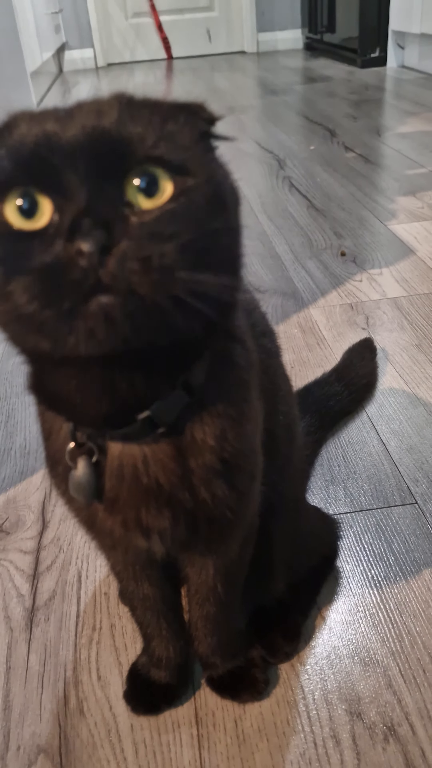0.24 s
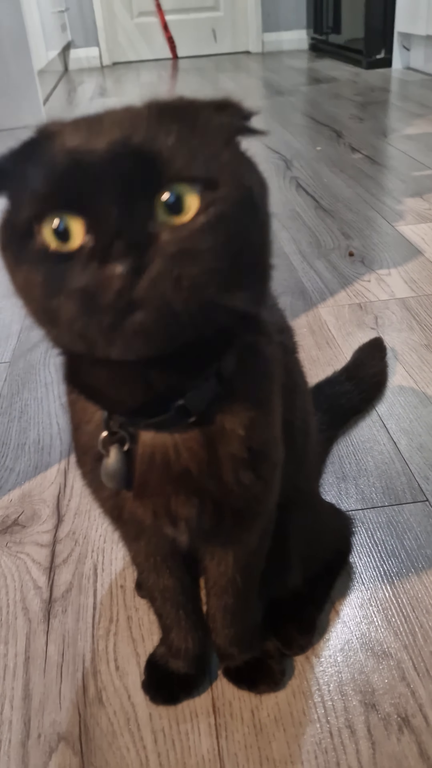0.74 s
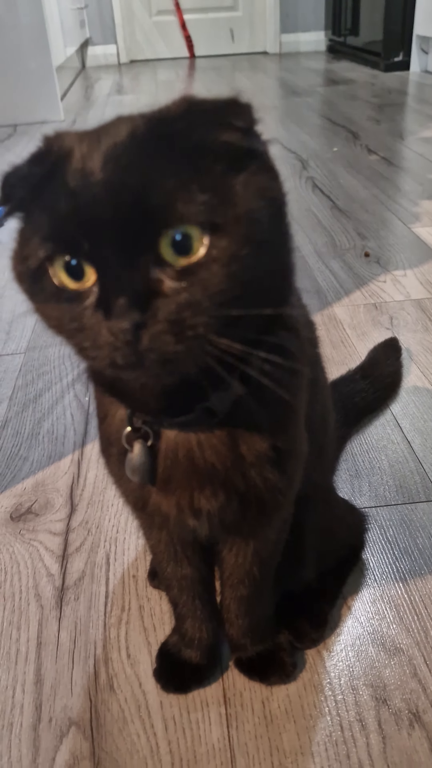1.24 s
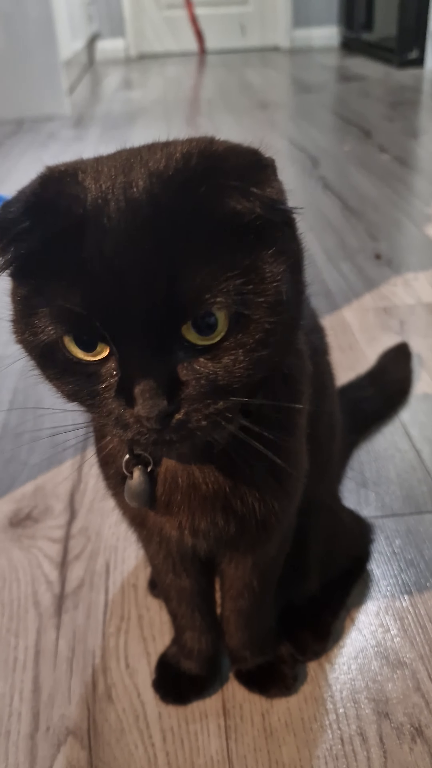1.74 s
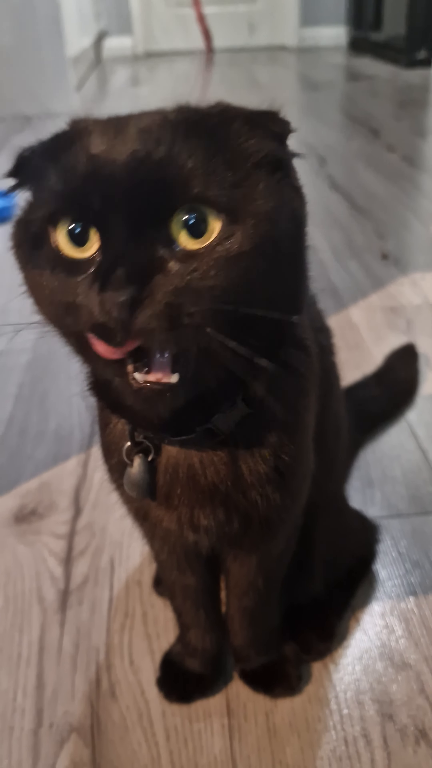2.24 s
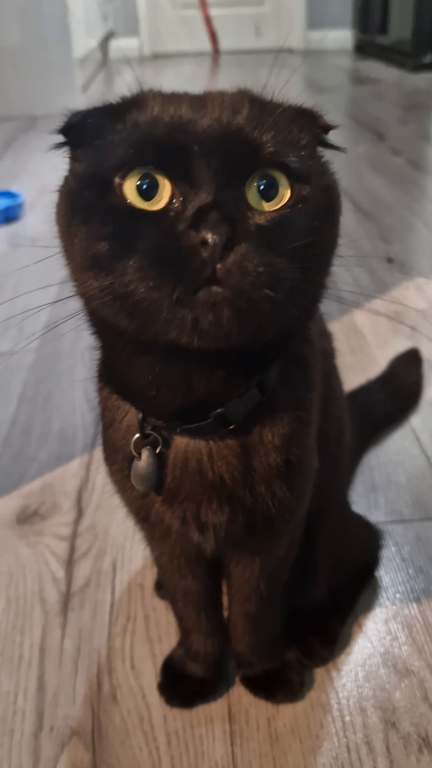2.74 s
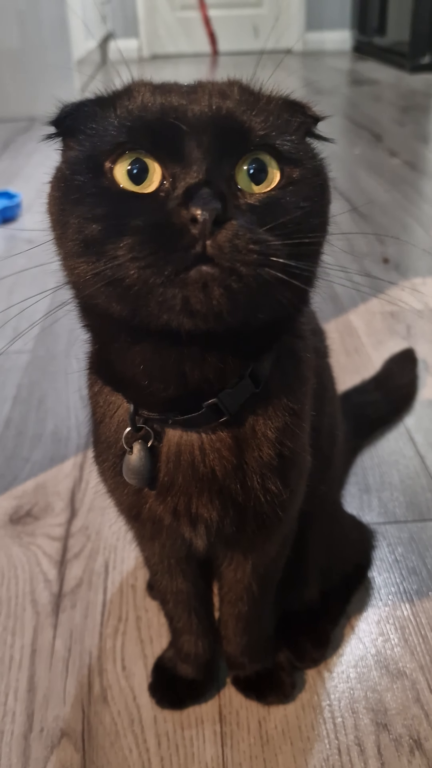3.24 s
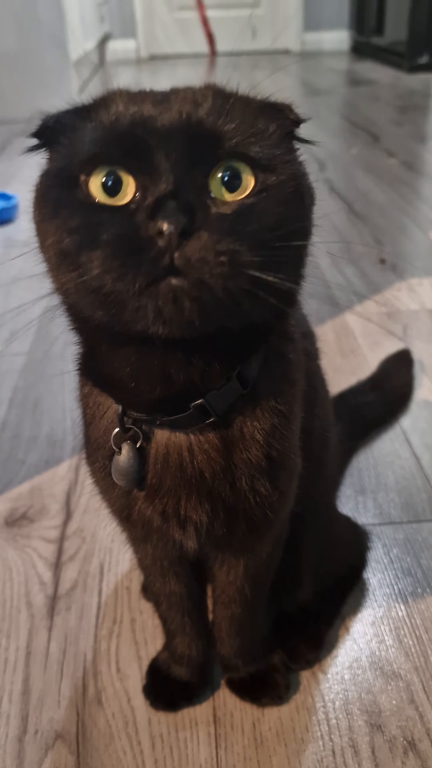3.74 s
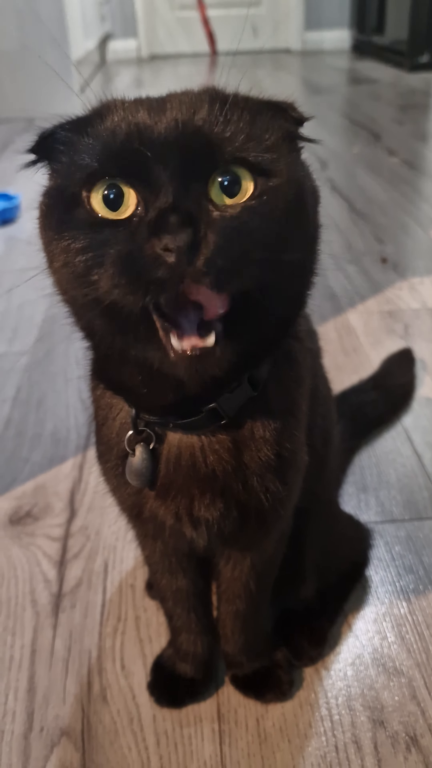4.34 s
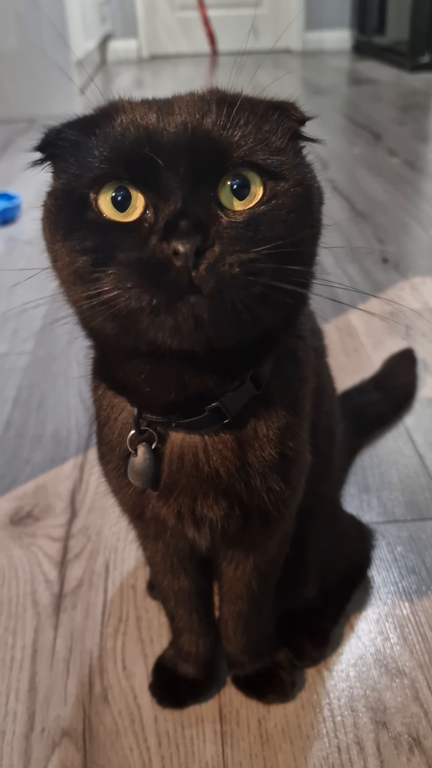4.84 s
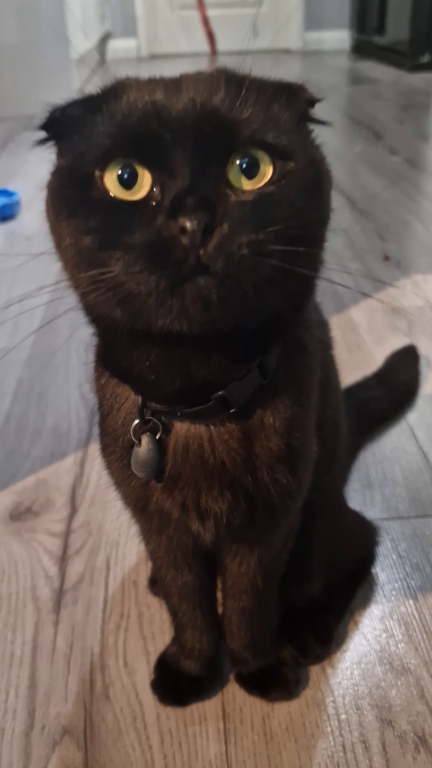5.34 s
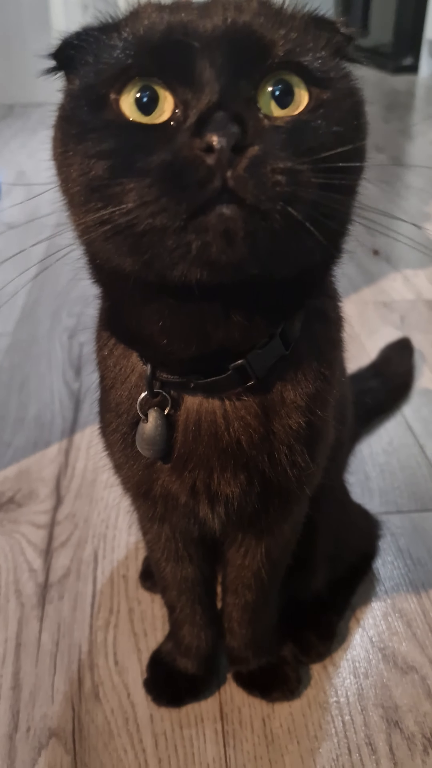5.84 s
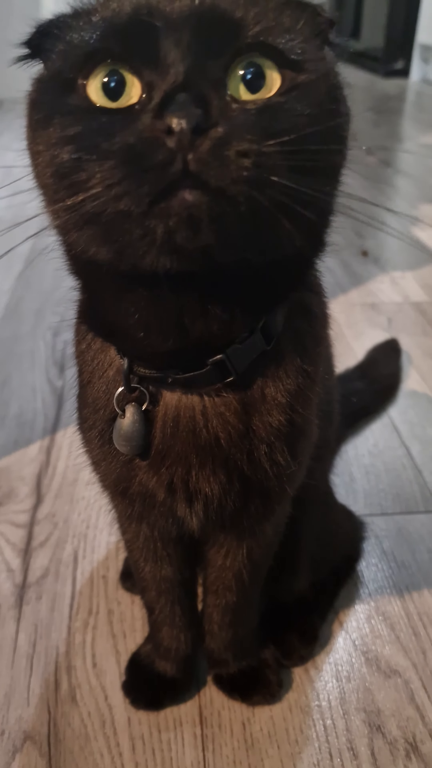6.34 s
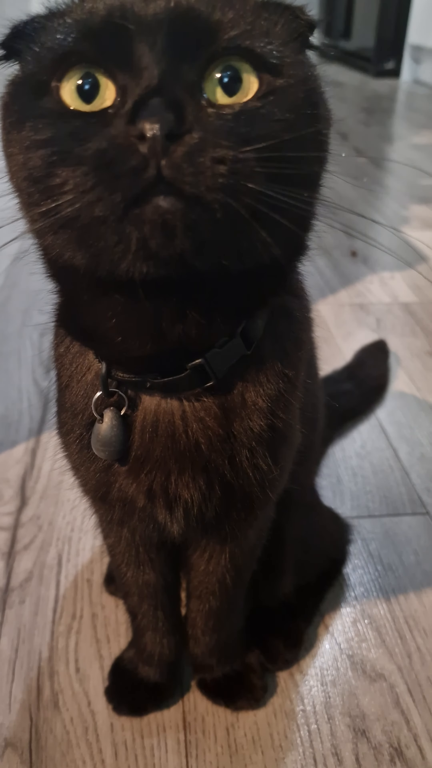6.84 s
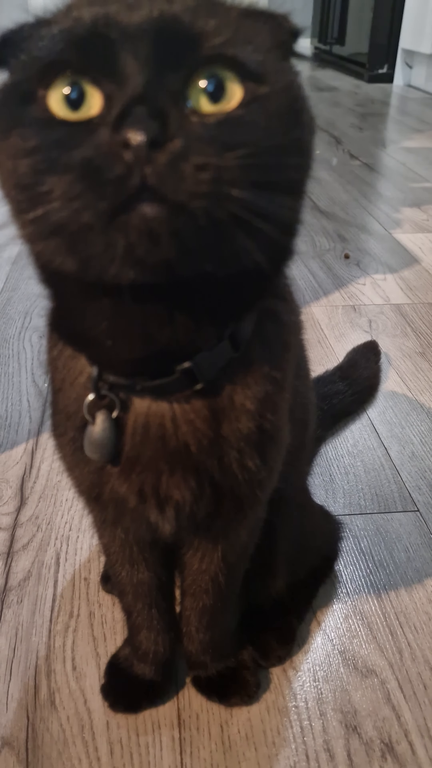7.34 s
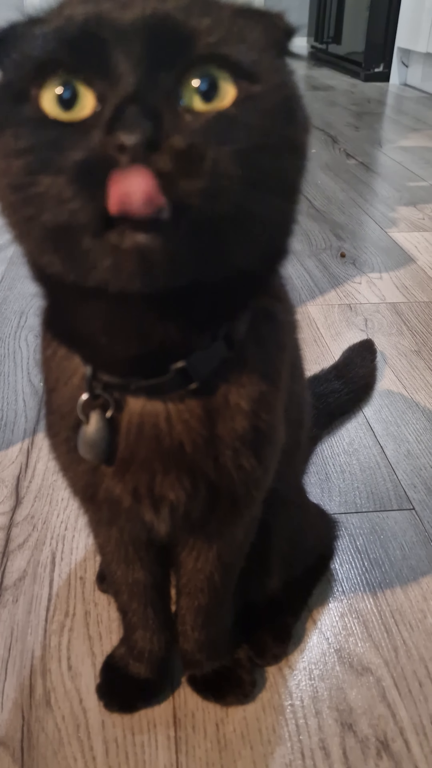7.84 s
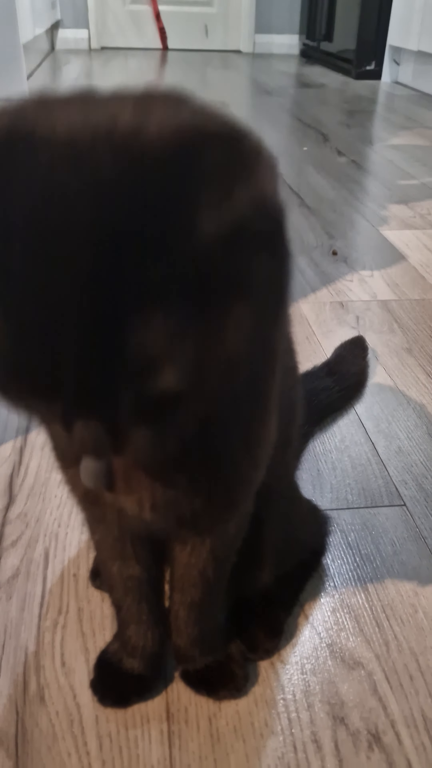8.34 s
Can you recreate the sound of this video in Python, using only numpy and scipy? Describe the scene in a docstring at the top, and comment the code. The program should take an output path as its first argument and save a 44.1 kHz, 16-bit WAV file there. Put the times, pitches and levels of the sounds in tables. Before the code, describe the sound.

Thin packaging crackles to the right for about two seconds, getting sharper and busier. A cat then eats very near the microphone: sticky lip pops, crisp crunches and gritty crumbs, thickest early on, later sparse with pauses, a second short crunch and wet tongue strokes. Indoors, quiet, with a short room tail, soft bumps and a distant steady hum.

```python
"""A cat eats a dry treat close to the microphone, in a quiet room with a hard floor; an appliance hums far off.
First something crinkly, likely the treat pouch, rubs and snaps off to the right, with dull handling bumps.
Then wet lip smacks and bursts of bites: each snap is a cluster of fractures ringing a hollow and a hard piece.
Crumbs grind as noisy slips; lips squeak as chirps; later the tongue licks in slips between smacks and bites.
The smacks and bites sway left and right with the head; a floor bounce and a short tail answer."""
import sys
import numpy as np
from scipy import signal
from scipy.fft import rfft, irfft, next_fast_len
from scipy.io import wavfile
from scipy.ndimage import uniform_filter1d, map_coordinates

SR = 44100
rng = np.random.default_rng(int(sys.argv[2]) if len(sys.argv) > 2 else 0)


def wav_record(signal):
    """Record a signal, one row per channel, as 16-bit PCM in the file named by sys.argv[1]."""
    frames = np.transpose(np.atleast_2d(signal))
    bounded = np.clip(frames, -1, 1)
    # unit amplitude maps onto the largest positive 16-bit level
    quanta = np.round(bounded * 32767).astype(np.int16)
    wavfile.write(sys.argv[1], SR, quanta)


N = 378373
TOP_HZ = 16200  # band limit of the microphone chain


def amp(db):
    """Decibels to gain."""
    return 10 ** (np.asarray(db) / 20)


def unit(x):
    """x at rms 1."""
    return x / np.sqrt(np.mean(x ** 2) + 1e-20)


def along(points, hz):
    """(Hz, value) points read on a log frequency axis."""
    f, v = np.transpose(points)
    return np.interp(np.log(hz + 1), np.log(f + 1), v)


def wobble(rate, n=N):
    """A smooth random curve of n samples, rate knots a second."""
    knots = rng.standard_normal(int(n * rate / SR) + 4)
    return map_coordinates(knots, [np.arange(n) * rate / SR])


def filtered(x, response):
    """x times a complex response of frequency."""
    n = x.shape[-1]
    m = next_fast_len(n + 2048)
    return irfft(rfft(x, m) * response(np.fft.rfftfreq(m, 1 / SR)), m)[..., :n]


def add(track, s, x):
    """Mix x into the track from time s."""
    part = track[:, max(round(s * SR), 0):][:, :x.shape[-1]]
    part += x[..., :part.shape[-1]]


def band(hz, low_hz, high_hz, order):
    """Gain of a band with a gentle low edge and a top edge of the given order."""
    low_edge = hz / np.hypot(hz, low_hz)
    return low_edge / np.sqrt(1 + (hz / high_hz) ** (2 * order))


def resonance(hz, centre_hz, q, skirt=3):
    """Gain of one damped resonance whose far skirts fall away."""
    u = hz / centre_hz
    peak = u / np.hypot(q * (1 - u * u), u)
    return peak * band(hz, centre_hz / skirt, centre_hz * skirt, order=1)


def causal(gain):
    """The response with this magnitude that rings only after the blow (minimum phase)."""
    cepstrum = irfft(np.log(np.maximum(gain, 1e-5 * gain.max())))
    half = len(cepstrum) // 2
    fold = np.r_[1, np.full(half - 1, 2), 1, np.zeros(half - 1)]
    return np.exp(rfft(cepstrum * fold))


def placed(pair, side_db):
    """The nearer microphone port hears a sound louder and earlier; positive side_db is left."""
    sides = np.array([[.5], [-.5]])
    gains = unit(amp(sides * side_db))
    left_lead = np.interp(side_db, [-7, 0, 3], [-4.3e-4, 0, 1.6e-4])  # s
    return filtered(pair, lambda hz: gains * np.exp(2j * np.pi * hz * sides * left_lead))


def snaps(table, first, scatter, hollow_q, ring_q, snap_low_hz, stretch, rise):
    """A main break amid a short cluster of tiny fractures; they ring a hollow and a hard piece."""
    out, size, lead = np.zeros((2, N)), 2048, 128  # samples
    t, hz = (np.arange(size) - lead) / SR, np.fft.rfftfreq(size, 1 / SR)
    for s, spread, hollow_hz, hollow_db, ring_hz, ring_db, snap_db, top_hz, side_db in table:
        grains = rng.standard_normal((3, size)) * amp(2.3 * rng.standard_normal(size))
        swell = np.exp(np.minimum(t / rise, -t / (stretch * spread)))
        # the small fractures radiate differently to each port
        cluster = unit((grains[:1] + scatter * grains[1:]) * swell)
        main_break = first * unit(1. * (t == 0))
        force = rfft(cluster + main_break)
        # the cluster keeps its fine ripple, but the ringing parts set the broad colour
        force = force / np.sqrt(uniform_filter1d(np.mean(np.abs(force) ** 2, 0), size=41))
        hollow = amp(hollow_db) * unit(resonance(hz, hollow_hz, hollow_q, skirt=5.5))
        ring = amp(ring_db) * unit(resonance(hz, ring_hz, ring_q))
        snap = amp(snap_db) * unit(band(hz, snap_low_hz, top_hz, order=4))
        colour = np.sqrt(hollow ** 2 + ring ** 2 + snap ** 2)
        add(out, s - lead / SR, placed(irfft(force * causal(colour)), side_db))
    return out


def small_snaps(strokes, count, spread_s, hollow_hz, ring_hz, over_db, snap_db, top_hz, vary_db):
    """Rows of chance little snaps, a few in each stroke, their strength following the stroke's."""
    rows = []
    for s, length, body_db, fizz_db in strokes:
        for when, (size, hollow, ring) in zip(rng.random(count), rng.standard_normal((count, 3))):
            db = over_db + vary_db * size
            rows.append((s + when * length, spread_s,
                         hollow_hz * 2 ** (0.25 * hollow), body_db + db,
                         ring_hz * 2 ** (0.1 * ring), body_db + db,
                         fizz_db + db + snap_db, top_hz))
    return rows


def effort(strokes, attack_s, release_s, swell_db):
    """Body and fizz gains: a stroke sets in, shifts by swell_db and lets go (20 dB per attack or release)."""
    t, gains = np.arange(N) / SR, np.zeros((2, N))
    for s, length, *levels in strokes:
        near = slice(*np.searchsorted(t, [s - 4 * attack_s, s + length + 4 * release_s]))
        u = t[near] - s
        edges = 20 * np.minimum(0, np.minimum(u / attack_s, (length - u) / release_s))
        shape = edges + swell_db * (np.clip(u / length, 0, 1) - .5)
        gains[:, near] = np.maximum(gains[:, near], amp(np.array(levels)[:, None] + shape))
    return gains


def pops(n, rate, pitch_hz, octaves, cycles, size_db):
    """n samples of scattered little pops, each a few cycles at its own pitch."""
    count = max(int(rate * n / SR), 2)
    when = ((np.arange(count) + rng.random(count)) * n / count).astype(int)[:, None]
    pitch, size = rng.standard_normal((2, count, 1))
    k = np.arange(SR // 50)
    turns = np.clip(pitch_hz * 2 ** (octaves * pitch), 350, 9000) * k / SR
    rings = np.sin(2 * np.pi * turns) * np.exp(-turns / cycles)
    rings = rings / np.linalg.norm(rings, axis=1, keepdims=True) * amp(size_db * np.clip(size, -2, 1.5))
    return unit(np.bincount((when + k).ravel(), rings.ravel(), n + len(k))[:n])


def friction(gains, colours, grain_db, flutter_db, scatter, side_db, pop_rate, pop_share):
    """Rubbing: a dense run of tiny slips, with a dull body, a bright fizz and separate pops."""
    slips = unit(amp(grain_db * wobble(1500) + flutter_db * wobble(70)))

    def slipping(colour):
        noise = rng.standard_normal((3, N))
        ports = noise[:1] + scatter * noise[1:]  # shared part and each port's own part
        return unit(filtered(slips * ports, lambda hz: amp(along(colour, hz))))

    body, fizz = [slipping(colour) for colour in colours]
    share = np.clip(pop_share, 0, 1)
    popping = pops(N, pop_rate, pitch_hz=1250, octaves=.85, cycles=2.3, size_db=3)
    body = np.sqrt(1 - share) * body + np.sqrt(share) * popping
    return placed(body * gains[0] + fizz * gains[1], side_db)


def patchy(x, depth_db, width_hz, life_s):
    """A surface that changes shape: its resonances form and fade at chance pitches."""
    hz, t, z = signal.stft(x, SR, nperseg=512)
    grid = np.meshgrid(hz / width_hz, t / life_s, indexing='ij')
    field = map_coordinates(rng.standard_normal((200, 600)), grid, order=1, mode='wrap')
    return signal.istft(z * unit(amp(depth_db * unit(field))), SR, nperseg=512)[1][:, :N]


def head_side(s):
    """Left-right dB of the mouth at time s, as the head turns and sways before the microphone."""
    # path of the head: (time [s], left over right [dB])
    head_path = [(2.15, -2), (2.5, 3.5), (2.77, 8.5), (2.85, 1.5), (3.0, 3), (3.27, 6), (3.5, -0.5),
                 (4.1, -1.5), (4.6, -1.5), (5.4, 7), (6.0, 5), (6.16, 0), (6.3, 2.5), (6.85, -3.5),
                 (7.2, 14), (7.6, 11), (8.14, -1), (8.45, 6)]
    return np.interp(s, *np.transpose(head_path))


def room_tone(hum_hz, hum_db, air_db):
    """A wavering appliance hum, a lone sine, over faint air noise partly shared by the two ports."""
    # colour of the still air: (frequency [Hz], relative level per Hz [dB])
    air_colour = [(20, -14.5), (50, 0), (80, 2), (120, 1.5), (180, -7), (280, -9), (450, -17.5),
                  (1000, -20.5), (2800, -29.5), (7000, -30.5), (10000, -41.5), (16000, -41)]
    # what the ports share: (frequency [Hz], left-right likeness [0 to 1])
    likeness = [(100, .93), (300, 0.52), (1400, 0.025)]

    def mid_side_gains(hz):
        turn = np.arccos(np.clip(along(likeness, hz), -1, 1)) / 2
        return amp(along(air_colour, hz)) * [np.cos(turn), np.sin(turn)]

    mid, side = filtered(rng.standard_normal((2, N)), mid_side_gains)
    phase = 2 * np.pi * np.cumsum(hum_hz + 2.224 * wobble(9)) / SR
    hum = amp(hum_db + 1.4 * wobble(7.6)) * unit(np.sin(phase))
    return hum + amp(air_db) * unit(np.array([mid + side, mid - side]))


def bumps():
    """Soft dull knocks of handling off to the right: decaying noise through one low resonance."""
    # handling knocks: (time [s], level [dB], pitch [Hz], time to fall 60 dB [s])
    knocks = [(1.195, -58, 92, .2), (1.425, -53.5, 105, .18), (1.903, -61.5, 150, 0.25),
              (2.045, -60.5, 125, 0.085), (3.383, -66.5, 160, .1), (4.121, -62.5, 200, .12),
              (5.945, -65.5, 65, 0.17), (6.326, -61, 58, 0.28)]
    out, t = np.zeros((2, N)), np.arange(SR // 3) / SR
    for s, db, pitch_hz, t60 in knocks:
        rumble = filtered(rng.standard_normal(len(t)), lambda hz: resonance(hz, pitch_hz, q=2.8))
        knock = unit(rumble * amp(-60 * t / t60) * (1 - np.exp(-t / 0.0041)))
        add(out, s, placed(amp(db) * knock, side_db=-6.5))
    return out


def room(x, wet_db, floor_db, floor_delay, build):
    """A quick bounce off the floor, then a diffuse tail; both are drawn anew each quarter second."""
    # decay of the room: (frequency [Hz], time to fall 60 dB [s])
    decay = [(150, 0.18), (700, 0.25), (2000, 0.37), (5500, 0.32), (10000, 0.35), (16000, 0.14)]
    # colour of the tail: (frequency [Hz], relative level [dB])
    tail_colour = [(100, -11), (350, 1.5), (700, 1.5), (1100, -2.5), (1700, -1.5), (2800, -1), (4400, 2),
                   (8000, -1), (16000, 2)]
    out, block = np.zeros((2, N)), SR // 4
    for start in range(0, N, block):
        near = x[:, start:start + block]
        # the room answers about equally on both sides
        near = np.array([unit(port) for port in near]) * np.sqrt(np.mean(near ** 2))
        hz, t, z = signal.stft(rng.standard_normal((2, SR // 2)), SR, nperseg=256)
        shape = amp(along(tail_colour, hz)[:, None] - 60 * t / along(decay, hz)[:, None])
        tail = signal.istft(z * shape, SR, nperseg=256)[1]
        tail = tail * (1 - np.exp(-np.arange(tail.shape[1]) / SR / build))
        answer = amp(wet_db) * tail / np.linalg.norm(tail[0])
        for port, delay in zip(answer, floor_delay * rng.uniform(0.99, 1.9, 2)):
            port[round(delay * SR)] += amp(floor_db)
        add(out, start / SR, signal.fftconvolve(near, answer, axes=1))
    return out


def pouch():
    """The pouch off to the right: sharp folds snap while its surface rubs in strokes."""
    # sharp folds: (time [s], spread before stretch [s], hollow [Hz], relative hollow level [dB],
    # ring [Hz], relative ring level [dB], relative snap level [dB])
    sharp_folds = [(0.2552, .0035, 950, -24.5, 6440, -32, -38), (0.267, 0.0026, 1560, -26, 7100, -24, -39),
                   (0.4584, 0.0015, 1030, -29, 1700, -25.5, -36),
                   (0.4989, 0.00056, 1110, -21.5, 2220, -20.5, -24),
                   (.612, 0.0098, 600, -42, 1800, -20, -34), (.7452, 0.0029, 720, -20, 7500, -32, -41),
                   (1.1188, 0.0017, 860, -24.5, 1900, -36, -29), (1.2862, 0.0019, 880, -27, 1630, -22, -31),
                   (1.3681, 0.0018, 830, -22, 1730, -18, -25.5),
                   (1.3955, 0.0011, 1080, -28, 1900, -44, -29.5),
                   (1.4337, 0.0028, 360, -17.5, 5500, -19, -12.5),
                   (1.48, .0007, 1010, -14.5, 2200, -17, -19.5),
                   (1.5469, 0.0027, 1820, -19.5, 6600, -33, -25.5),
                   (1.579, 0.0027, 930, -21.5, 1630, -20, -36),
                   (1.5955, 0.0012, 700, -23, 8100, -14, -14.5), (1.7526, .0015, 560, -26, 1500, -25, -27),
                   (1.7681, 0.00048, 1360, -14.5, 7660, -12.5, -17.5),
                   (1.8768, 0.0015, 930, -35, 2130, -19.5, -38),
                   (1.909, .0035, 825, -8.5, 8460, -9.5, -14.5),
                   (1.976, .0016, 580, -11, 10300, -17, -13.5),
                   (2.0468, 0.0025, 418, -23.5, 2000, -36, -19.5)]
    # strokes of rubbing: (time [s], length [s], relative body level [dB], relative fizz level [dB])
    rubs = [(0, 0.061, -63.5, -63.5), (.165, .11, -52.5, -54.5), (.45, 0.076, -58.5, -57.5),
            (.6, 0.15, -56, -55.5), (.85, 0.35, -75.5, -72), (1.205, 0.11, -53.5, -53.5),
            (1.425, 0.016, -44.5, -48), (1.46, 0.043, -51.5, -56), (1.585, 0.039, -48, -49),
            (1.645, .05, -43, -52), (1.74, 0.092, -54, -57), (1.83, 0.11, -48, -55.5),
            (2.025, 0.031, -49, -66), (2.18, 0.29, -71, -67)]
    # dull part, then bright part: (frequency [Hz], relative level per Hz [dB])
    rub_colours = [
        [(100, -23.5), (300, -2.5), (450, -5), (560, -3.5), (800, 1.5), (1100, -3.5), (1400, -0.5), (2100, -4),
         (3000, -24), (5000, -27)],
        [(2000, -22), (3300, 1.5), (4900, 0.5), (6000, 2), (7600, 7.5), (9500, -2.5), (13000, -1.5),
         (16000, -7.5)],
    ]
    fold_top_hz, pouch_side_db = 8500, -6
    folds = [(*row, fold_top_hz) for row in sharp_folds]
    folds += small_snaps(rubs, count=2, spread_s=0.0031, hollow_hz=900, ring_hz=1800,
                         over_db=17, snap_db=2.5, top_hz=12000, vary_db=6.0)
    crinkles = snaps([(*row, pouch_side_db) for row in folds], first=0.65, scatter=1.0,
                     hollow_q=2.9, ring_q=3.8, snap_low_hz=1500, stretch=1.9, rise=0.00068)
    pressure = effort(rubs, attack_s=0.052, release_s=0.049, swell_db=1)
    rubbing = friction(pressure, rub_colours, grain_db=5.0, flutter_db=4.0, scatter=1.0,
                       side_db=pouch_side_db, pop_rate=190, pop_share=0.14)
    return amp(1) * crinkles + amp(1) * patchy(rubbing, depth_db=2.5, width_hz=200, life_s=.02)


def lip_squeak(rough, count):
    """Air squeezed through wet lips chirps upward: a rough sine with a few overtones."""
    # squeaks: (time [s], length [s], start pitch [Hz], rise [Hz/s], level of the fundamental at its
    # height [dB], loss per overtone [dB])
    squeaks = [(4.439, 0.037, 4380, 55000, -51.5, 28), (7.984, 0.076, 841, 604, -58, 5.5)]
    out = np.zeros((2, N))
    for s, length, start_hz, rise_hz_per_s, db, loss_db in squeaks:
        t = np.arange(int(length * SR)) / SR
        hz = (start_hz + rise_hz_per_s * t) * (1 + rough * wobble(2200, SR)[:len(t)])
        phase = 2 * np.pi * np.cumsum(hz) / SR
        tone = np.zeros(len(t))
        for k in range(count):
            in_band = (k + 1) * hz < TOP_HZ
            tone += amp(db - loss_db * k) * np.sin((k + 1) * phase) * in_band
        add(out, s, signal.windows.hann(len(t)) * tone)
    return out


def licking():
    """The tongue wipes the lips in short wet strokes: noisy slips and pops, a little to the left."""
    # strokes of the tongue: (time [s], length [s], relative body level [dB], relative fizz level [dB])
    licks = [(5.38, 0.1, -72.5, -70.5), (5.465, 0.048, -55, -55), (5.892, 0.013, -65.5, -60),
             (5.98, 0.02, -57.5, -59), (7.495, 0.01, -59, -76), (7.59, 0.071, -58.5, -56.5),
             (8.01, 0.066, -69.5, -64), (8.125, 0.093, -63.5, -59.5), (8.448, 0.075, -61.5, -63.5),
             (8.56, 0.022, -57, -66)]
    # dull part, then bright part: (frequency [Hz], relative level per Hz [dB])
    lick_colours = [
        [(100, -16.5), (280, 1), (520, 2), (880, -8.5), (1150, -8), (1700, -1.5), (2700, -13), (5000, -32)],
        [(2000, -18.5), (3500, 2.5), (5000, 1), (7300, 5), (10000, -4), (14500, -9.5), (16000, -11)],
    ]
    pressure = effort(licks, attack_s=0.021, release_s=0.029, swell_db=-1.5)
    wipes = friction(pressure, lick_colours, grain_db=5.5, flutter_db=6, scatter=1.0,
                     side_db=2.5, pop_rate=120, pop_share=0.21)
    return amp(2) * patchy(wipes, depth_db=2.5, width_hz=220, life_s=.03)


def smacking():
    """The lips part with a wet pop, and the hollow of the mouth rings on."""
    # soft smacks: (time [s], mouth [Hz], relative mouth level [dB], ring [Hz],
    # relative ring level [dB], relative snap level [dB])
    smacks = [(2.1027, 493, -32.5, 1300, -33, -47), (2.1449, 395, -29, 1700, -26.5, -43),
              (2.1733, 720, -32, 1400, -30, -57), (2.571, 1360, -29.5, 2400, -32, -35),
              (2.6403, 378, -29, 1500, -23.5, -35.5), (2.7525, 1200, -36, 1850, -20, -27),
              (2.829, 500, -23, 1200, -29, -24), (3.245, 1850, -29, 2550, -27.5, -60),
              (3.3517, 686, -24, 1600, -33, -35), (4.34, 1250, -33, 1910, -31.5, -42.5),
              (4.4876, 332, -42, 1450, -33, -61), (5.1761, 490, -28, 1210, -29, -63),
              (5.6287, 520, -31, 1430, -36.5, -40), (5.982, 536, -28, 1700, -33, -38),
              (6.215, 510, -23, 1100, -32, -26.5), (6.5816, 363, -25, 800, -34, -46),
              (7.533, 850, -34.5, 1350, -31, -54), (7.5896, 500, -29, 1893, -28.5, -28.5),
              (8.028, 501, -38, 1640, -34, -40), (8.4877, 810, -29.5, 1500, -43, -42)]
    spread_s, top_hz = .0022, 6000  # crackle length before stretch; top edge of the snap
    rows = [(s, spread_s, *tone, top_hz, head_side(s)) for s, *tone in smacks]
    return amp(1.5) * snaps(rows, first=.4, scatter=.7, hollow_q=6, ring_q=4.5,
                            snap_low_hz=1100, stretch=1.3, rise=.0004)


def chewing():
    """Teeth crack the treat in fracture clusters; crumbs grind and break between the bites."""
    # cracks of the treat: (time [s], spread before stretch [s], mouth [Hz], relative mouth level [dB],
    # ring [Hz], relative ring level [dB], relative snap level [dB], top edge of the snap [Hz])
    cracks = [(2.4979, 0.0031, 710, -29, 1630, -22, -21.5, 9350),
              (2.6701, 0.0039, 507, -22, 1350, -20.5, -26, 7200),
              (2.741, 0.00096, 1500, -35, 1840, -17, -19.5, 5900),
              (2.789, 0.0012, 1130, -42, 2020, -22, -21.5, 7800),
              (2.8369, .0014, 416, -19.5, 1740, -17, -9.5, 11700),
              (2.9426, 0.0008, 584, -20.5, 11900, -10, -11, 19900),
              (2.9481, 0.0024, 356, -19.5, 1600, -12, -3.5, 19900),
              (3.2864, 0.0006, 1580, -56, 5460, -31, -48, 12800),
              (3.3295, 0.0017, 537, -20.5, 1500, -15, -19, 6250),
              (3.3604, 0.0014, 655, -21.5, 2100, -32, -20, 9000),
              (3.3838, 0.0026, 553, -9.5, 1350, -6.5, -7.5, 10000),
              (3.425, 0.0011, 342, -28, 2170, -22, -18, 4900),
              (3.4642, .0011, 390, -38, 1990, -29, -18.5, 6700),
              (3.49, 0.0024, 353, -22.5, 1750, -16.5, -12.5, 9000),
              (3.5077, 0.0028, 1810, -17, 2800, -28, -11.5, 19900),
              (3.5341, .0022, 466, -27, 1500, -14, -13, 6630),
              (3.5395, .002, 480, -21, 1600, -15.5, -14.5, 11000),
              (3.5532, 0.00048, 1660, -20, 7300, -13, -13, 19900),
              (3.6679, 0.0014, 630, -27, 1160, -32, -19, 5170),
              (3.7231, 0.00056, 366, -28.5, 1300, -31, -27, 5500),
              (3.7487, .0023, 660, -22, 2020, -25, -22.5, 7760),
              (3.799, 0.00076, 352, -24, 1500, -19.5, -19.5, 10300),
              (3.8332, 0.00093, 550, -20.5, 1900, -19.5, -12.5, 7800),
              (3.883, 0.0011, 580, -17, 1620, -12.5, -9.5, 5900),
              (3.8934, 0.00076, 1800, -38, 5100, -17.5, -13.5, 11900),
              (3.911, .0017, 605, -28.5, 1900, -21.5, -33, 6000),
              (3.932, .0015, 450, -28.5, 2000, -30.5, -24.5, 8000),
              (3.9702, 0.0025, 770, -27, 6700, -10.5, -12.5, 13350),
              (4.0246, .0026, 1895, -16.5, 5200, -11.5, -10, 15900),
              (4.0585, 0.0027, 450, -20.5, 1430, -23, -18, 7560),
              (4.07, .0015, 1500, -25, 4500, -30, -25, 8000),
              (4.0841, .0019, 1340, -20, 4500, -27, -16.5, 6600),
              (4.1003, 0.00069, 730, -21, 6400, -1, -11, 10400),
              (4.1195, .0032, 500, -13.5, 1800, -9, -1, 18100),
              (4.1461, 0.00095, 730, -6, 5080, -4.5, -6, 12900),
              (4.6115, 0.00068, 900, -19, 2150, -13, -8.5, 7120),
              (4.7239, .0022, 965, -23, 2020, -31.5, -26.5, 6300),
              (5.377, .0011, 1500, -44, 5400, -41, -45, 9000),
              (5.497, .0009, 351, -32, 1210, -25.5, -25, 15260),
              (6.0059, 0.0014, 1993, -30, 5600, -15.5, -10.5, 10900),
              (6.0855, 0.0022, 1320, -34, 5100, -24, -21, 7600),
              (6.1483, 0.0016, 327, -41, 3470, -24.5, -27, 7000),
              (6.1571, 0.0021, 1530, -5.5, 5000, -9, -5, 11900),
              (6.1893, 0.0015, 1700, -14, 3800, -10.5, -12, 19750),
              (6.3012, 0.0012, 1880, -11.5, 2670, -4.5, -10.5, 7300),
              (6.4563, .0012, 890, -34, 8000, -27, -29, 6340),
              (6.4746, 0.0031, 456, -26, 7600, -17, -21.5, 4300),
              (6.4912, 0.00046, 790, -21, 3750, -14, -21, 6300),
              (6.51, 0.0016, 1500, -37, 7450, -19, -40, 9000),
              (6.5573, 0.00074, 474, -23, 1180, -19, -18.5, 8200),
              (6.6601, 0.0014, 517, -24, 1160, -16.5, -11, 7760),
              (6.7805, 0.0013, 1750, -21, 4670, -29, -22, 6940),
              (6.8508, 0.0017, 327, -29, 1350, -16, -18, 6440),
              (7.0415, 0.00053, 1750, -18.5, 5530, -13, -22.5, 8500),
              (7.199, 0.0013, 1460, -18.5, 3720, -21.5, -25.5, 4960),
              (8.1466, 0.0026, 635, -31, 1500, -17, -14.5, 7230)]
    # crumbs between the teeth: (time [s], length [s], relative body level [dB], relative fizz level [dB])
    grinds = [(3.285, 0.067, -73, -57), (3.36, 0.18, -58.5, -58), (3.7, .12, -59, -68.5),
              (3.86, 0.25, -53.5, -58), (4.2, .14, -68, -61), (6.13, .06, -58.5, -51.5),
              (6.46, 0.11, -57.5, -56)]
    # dull part, then bright part: (frequency [Hz], relative level per Hz [dB])
    mouth_colours = [
        [(100, -13.5), (280, 1), (520, -4), (880, 0), (1150, -17), (1700, -3.5), (2700, -13.5), (5000, -30.5)],
        [(2000, -18.5), (3500, 6), (5000, -4.5), (7300, 6.5), (10000, -11.5), (14500, -10.5), (16000, -10.5)],
    ]
    scraps = small_snaps(grinds, count=4, spread_s=.0011, hollow_hz=550, ring_hz=1700,
                         over_db=26, snap_db=-0.5, top_hz=8000, vary_db=3.5)
    rows = [(*row, head_side(row[0])) for row in [*cracks, *scraps]]
    bites = snaps(rows, first=0.32, scatter=0.94, hollow_q=3.46, ring_q=5.0,
                  snap_low_hz=1100, stretch=1.4, rise=0.00036)
    pressure = effort(grinds, attack_s=0.069, release_s=0.12, swell_db=1)
    crumbs = friction(pressure, mouth_colours, grain_db=5.5, flutter_db=3.0, scatter=0.46,
                      side_db=2.0, pop_rate=64, pop_share=0.65)
    return amp(1.5) * bites + amp(-2.5) * crumbs


def scene():
    """The quiet background, the close sounds and the room's answer to them."""
    background = room_tone(hum_hz=84.0, hum_db=-64.5, air_db=-65) + bumps()
    close = pouch() + lip_squeak(rough=0.11, count=4) + licking() + smacking() + chewing()
    echo = room(close, wet_db=-9.5, floor_db=-24.5, floor_delay=.005, build=0.0022)  # times in s
    return background + close + echo


def record(dry):
    """The microphone chain cuts steeply above its band limit."""
    return filtered(dry, lambda hz: 1 / np.sqrt(1 + (hz / TOP_HZ) ** 120))


dry = scene()
out = record(dry)
wav_record(out)
```